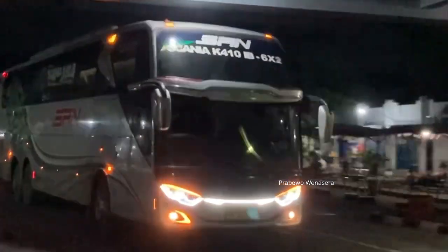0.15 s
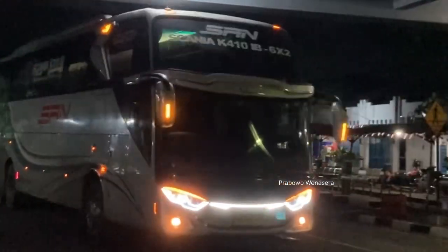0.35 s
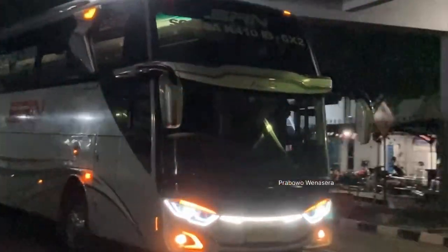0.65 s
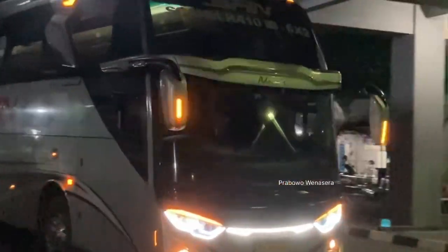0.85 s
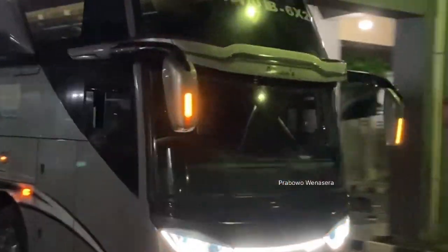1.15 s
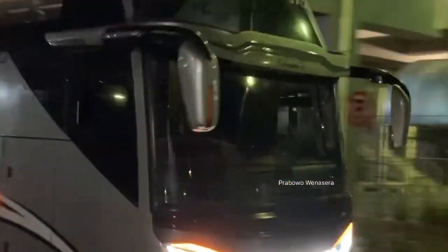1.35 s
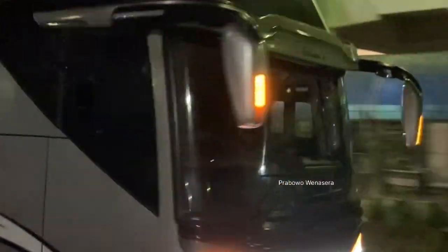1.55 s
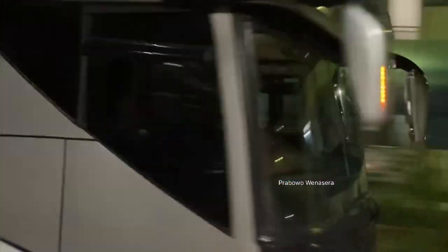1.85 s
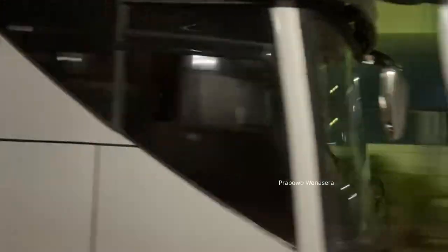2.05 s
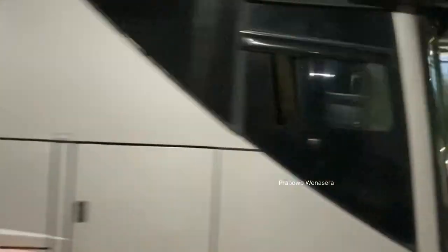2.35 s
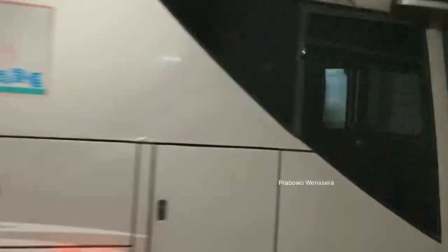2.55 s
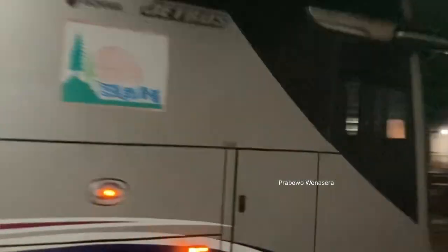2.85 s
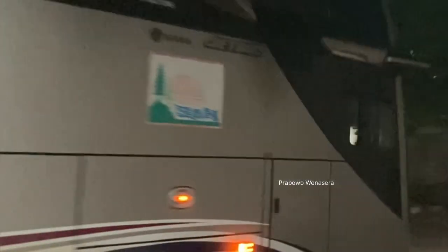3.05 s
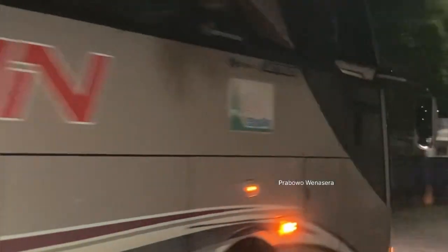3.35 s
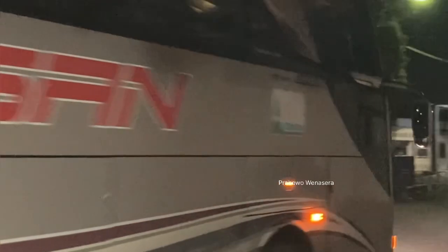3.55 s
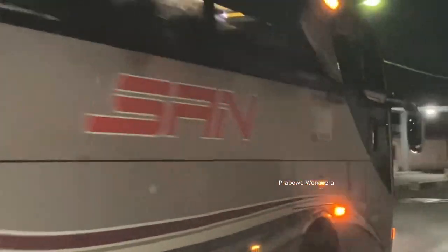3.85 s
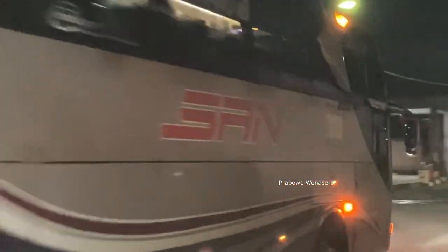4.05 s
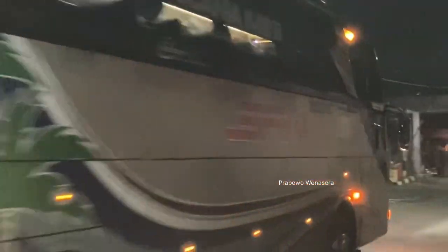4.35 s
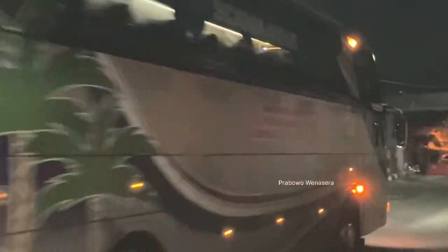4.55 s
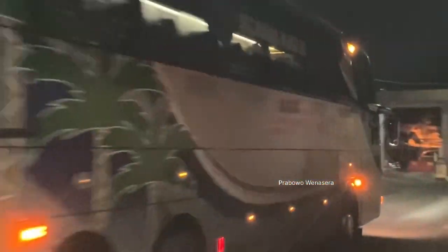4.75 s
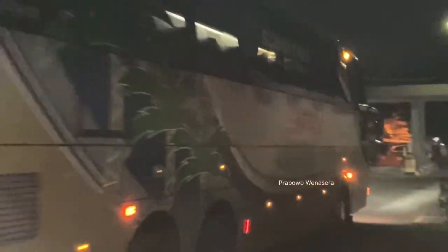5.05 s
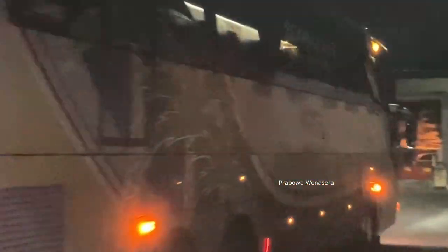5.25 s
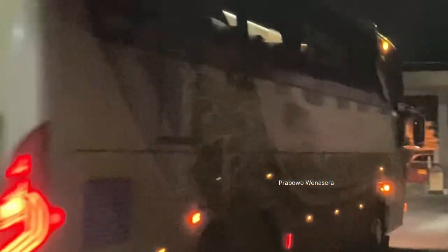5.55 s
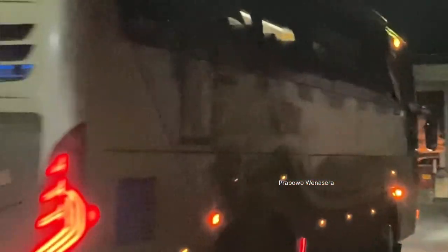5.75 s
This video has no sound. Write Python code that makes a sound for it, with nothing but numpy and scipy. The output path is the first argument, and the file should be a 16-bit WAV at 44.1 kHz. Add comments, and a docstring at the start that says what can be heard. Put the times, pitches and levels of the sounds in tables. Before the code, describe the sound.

Outdoors at the roadside, a large diesel coach approaches slowly with a low droning exhaust, faint gear hum and wavering belt whine. Soft low jolts thud as the body passes very close to the stereo microphone. Tyres hum, grit cracks and air sputters beneath; then the rear engine brings knocking clatter, broad fan roar and bright hiss with a sharp air spit, before everything sinks and eases off.

```python
"""At the roadside a diesel coach rolls up slowly, exhaust droning and tyres humming; gears and belt whine.
It passes at arm's length, the body jolting, grit cracking and air sputtering and spitting underneath.
The rear engine comes last: knock, clatter and grille noise swell with fan wash, intake hiss and sinking
resonances. Then the coach leaves and the engine eases off. Noise shaped by spectra and gates makes the
rough sounds, wavering sines the notes; left and right differ in level and phase."""
import sys
import numpy as np
from scipy import signal
from scipy.fft import rfft, irfft, next_fast_len
from scipy.io import wavfile
from scipy.ndimage import map_coordinates

SR = 44100
rng = np.random.default_rng(int(sys.argv[2]) if len(sys.argv) > 2 else 0)


def inscribe(sig):
    """Save sig as 16-bit PCM at rate SR to the path in sys.argv[1].

    A 1-D sig is mono; a 2-D sig holds one channel per row.
    Samples are clipped to [-1, 1] before scaling.
    """
    pcm = np.round(np.clip(np.atleast_2d(sig).T, -1, 1) * 32767)
    wavfile.write(sys.argv[1], SR, pcm.astype(np.int16))


N = 260190

# when the wheels and the engine bay are closest to the microphone (s)
WHEELS_S, ENGINE_S = 3.56, 4.36
# colour of the hard combustion clatter: [f/Hz, level/dB per Hz]
CLATTER_COLOUR = [(500, -19), (800, -6.5), (1050, 1.5), (1300, -0.5), (1550, -1.5), (2000, -3.5),
                  (2500, -8.5), (3400, -15), (6000, -41)]
# colour of spitting air and of cracking grit: [f/Hz, level/dB per Hz]
SPIT_COLOUR = [(3000, -21), (6000, 2.5), (7800, 2), (10000, 4.5), (13000, 4.5), (16000, -38)]


def amp(db):
    """Decibels to gain."""
    return 10 ** (np.asarray(db) / 20)


def unit(x):
    """Scale to rms 1."""
    return x / np.sqrt(np.mean(np.abs(x) ** 2) + 1e-20)


def along(points, hz):
    """Read (f/Hz, value) points on a log frequency axis."""
    f, v = np.transpose(points)
    return np.interp(np.log(hz + 1), np.log(f + 1), v)


def curves(rows):
    """One value per sample for each column after the time."""
    s, *cols = np.transpose(rows)
    return [np.interp(np.arange(N) / SR, s, c) for c in cols]


def wobble(rate):
    """A smooth random curve of rms 1, with rate knots a second."""
    knots = rng.standard_normal(2048)
    return unit(map_coordinates(knots, [np.arange(N) * rate / SR], mode="wrap"))


def step(middle_s, half_s):
    """A smooth rise from 0 to 1."""
    return (1 + np.tanh((np.arange(N) / SR - middle_s) / half_s)) / 2


def swells(rows):
    """Level in dB of bell-shaped swells [t/s, half-length/s, level/dB], their powers added."""
    t = np.arange(N) / SR
    power = sum((amp(db) * np.exp(-((t - s) / half_s) ** 2 / 2)) ** 2 for s, half_s, db in rows)
    return 10 * np.log10(power + 1e-12)


def decays(rows, attack_s):
    """Envelope of sudden events [t/s, level/dB, t60/s] that die away."""
    envelope = np.zeros(N)
    for s, db, t60 in rows:
        age = np.maximum(np.arange(N) / SR - s, 0)
        envelope += amp(db - 60 * age / t60) * (1 - np.exp(-age / attack_s))
    return envelope


def passing(closest_s, peak_db, near_s, rise_db, fall_db):
    """Level in dB of a part going by: rise_db (coming) or fall_db (going) lost per doubling of distance.

    It counts as near for near_s either side of closest_s."""
    late = np.arange(N) / SR - closest_s
    doublings = np.log2(np.hypot(1, late / near_s))
    return peak_db - np.where(late < 0, rise_db, fall_db) * doublings


def head_on():
    """1 while the front of the body screens the treble, 0 once the flank shows."""
    return 1 - step(middle_s=1.3, half_s=0.11)


def hidden():
    """1 while the corner of the body screens the engine, else 0 (until the rear face shows)."""
    return step(middle_s=4.53, half_s=0.11) - step(middle_s=5.77, half_s=0.11)


def filtered(x, response):
    """x times a complex response of frequency."""
    size = next_fast_len(N + 8192)
    hz = np.fft.rfftfreq(size, 1 / SR)
    return irfft(rfft(x, size) * response(hz), size)[..., :N]


def bay(hz):
    """Direct sound plus the resonant ringing of engine block and panels."""
    # resonances of the engine and its bay: [f/Hz, width/Hz, level/dB]
    bay_modes = [(210, 42, -9.5), (259, 63, -2.5), (640, 175, -4.5), (1080, 290, -6), (1240, 72, -13),
                 (1910, 160, -8), (2164, 39, -1), (4050, 150, -10)]
    ringing = sum(amp(db) * 1j * hz * width / (mode * mode - hz * hz + 1j * hz * width)
                  for mode, width, db in bay_modes)
    return 1 + ringing


def rush(spectrum, gate=1, body=bay):
    """Gated stereo noise of rms 1, coloured and sent through a ringing body, usually the engine bay."""
    # likeness of left and right noise: [f/Hz, likeness/0-1]
    likeness = [(100, 1), (220, 1), (400, 0.77), (650, 0.47), (1200, 0.55), (2100, 0.58), (3000, 0.46),
                (4200, 0.12), (5300, 1), (6000, 1), (6800, 0.46), (8500, 1), (15000, 1)]

    def response(hz):
        turn = np.arccos(np.clip(along(likeness, hz), 0, 1)) / 2
        mid_side = np.array([np.cos(turn), np.sin(turn)])
        return amp(along(spectrum, hz)) * body(hz) * mid_side
    mid, side = filtered(gate * rng.standard_normal((2, N)), response)
    return unit(np.array([mid + side, mid - side]))


def bursts(cycles, share, life, scatter_db):
    """A gate with one dying burst per cycle, each of its own size, over a steady rest."""
    sizes = amp(scatter_db * rng.standard_normal(1024))[cycles.astype(int) % 1024]
    dying = unit(sizes * np.exp(-(cycles % 1) / life))
    share = np.clip(share, 0, 1)
    return np.sqrt(1 - share + share * dying ** 2)


def patches(x, depth_db, width, length):
    """Random gains lift and sink narrow bands of x for moments at a time, making the noise clumpier."""
    z = signal.stft(x, nperseg=2048)[2]
    field = rng.standard_normal(z.shape[1:])
    # smooth the random field across frequency bins, then across time frames
    for axis, span in enumerate([width, length]):
        bell = np.exp(-(np.arange(-12, 13) / span) ** 2)
        field = signal.fftconvolve(field, np.expand_dims(bell, 1 - axis), mode="same")
    gain = unit(amp(depth_db * unit(field)))
    return signal.istft(z * gain, nperseg=2048)[1][:, :N]


def tone(cycles, level_db, rough_db, drift):
    """A low line whose level and phase are a little unsteady."""
    phase = 2 * np.pi * cycles + drift * wobble(7.7)
    return amp(level_db + rough_db * wobble(13)) * np.sqrt(2) * np.sin(phase)


def whine(hz, level_db, rough, flutter_rate):
    """One wavering line, frayed by fast flutter; the rougher, the more it turns to a band of noise."""
    def shake(rate):
        return wobble(rate) + 1j * wobble(rate)
    fray, fray_rate = 0.6, 260
    flutter = unit(1 + rough * (shake(flutter_rate) + fray * shake(fray_rate)))
    line = np.exp(2j * np.pi * np.cumsum(hz) / SR)
    return amp(level_db) * np.sqrt(2) * np.real(flutter * line)


def exhaust(firings):
    """Crank orders drone from the pipe and beat against a steady low hum."""
    # swells of the drone, each on one crank order: [t/s, half-length/s, level/dB, order]
    drone_swells = [(0, 0.21, -36.5, 6), (1.1, 0.6, -40, 6), (0.72, 0.055, -33.5, 8), (1.337, 0.36, -35, 8),
                    (2.05, 0.23, -37, 3), (2.9, 0.3, -38, 3), (2.5, 0.56, -30.5, 6),
                    (2.548, 0.35, -38.5, 17), (2.898, 0.091, -29.5, 6), (3.45, 0.37, -36.5, 6),
                    (3.45, 0.098, -41, 8), (3.53, 0.052, -33.5, 15), (4.544, 0.55, -34, 8),
                    (4.8, 0.33, -35.5, 6), (5.544, 0.36, -34.5, 15), (5.638, 0.22, -31, 6),
                    (5.75, .3, -36.5, 8)]
    # swells of the hum: [t/s, half-length/s, level/dB]
    hum_swells = [(.48, 0.13, -32), (1.03, 0.12, -32), (2.1, 0.38, -40), (3.08, 0.14, -28),
                  (3.35, 0.17, -32), (4.0, 0.091, -26), (4.2, 0.14, -29)]
    turns = firings / 3  # six cylinders fire three times per crank turn
    drone = sum(tone(round(order) * turns, swells([(s, half_s, db)]), rough_db=0.8, drift=0.1)
                for s, half_s, db, order in drone_swells)
    hum_hz, hum_rest_db = 60, -40.3  # pitch, and the level kept between swells
    hum_db = 20 * np.log10(np.hypot(amp(hum_rest_db), amp(swells(hum_swells))))
    hum = tone(hum_hz * np.arange(N) / SR, hum_db, rough_db=-1, drift=0.11)
    return drone + hum


def puffs(firings, uneven, rough):
    """One pressure pulse per firing; the six cylinders differ, which fills in the half orders."""
    # colour of the tail pipe: [f/Hz, level/dB]
    pipe_colour = [(60, -38), (130, -0.5), (200, 4.5), (300, 2.5), (450, -5.5), (900, -26)]
    at = np.flatnonzero(np.diff(np.floor(firings)))
    cylinders = 1 + uneven * unit(rng.standard_normal(6))
    train = np.zeros(N)
    train[at] = np.resize(cylinders, len(at)) + rough * rng.standard_normal(1024)[:len(at)]
    return unit(filtered(train, lambda hz: amp(along(pipe_colour, hz)) * bay(hz)))


def engine(firings):
    """Firings thump the pipe, knock the block and set injectors and valves clattering over a low rumble.

    Of knock, clatter and grille noise, the brighter the layer, the more sharply it peaks in passing."""
    # colours of rumble, block knock and grille noise: [f/Hz, level/dB per Hz]
    rumble_colour = [(15, -40), (30, -16), (40, -7), (48, -2), (65, -2.5), (85, 1), (110, -4.5),
                     (135, -3.5), (170, -14.5), (300, -49)]
    knock_colour = [(90, -25), (160, -0.5), (250, 0), (400, -1.5), (500, -3.5), (720, -2), (900, -2.5),
                    (1400, -27.5)]
    grille_colour = [(1500, -15.5), (2500, 5), (3100, 0), (4200, -6), (5000, -5.5), (6200, -17),
                     (9000, -49)]
    # brief surges of clatter and of the brighter grille noise: [t/s, half-length/s, level/dB]
    clatter_surges = [(4.01, .025, -27.5), (4.29, .08, -26.5), (5.82, .05, -33)]
    grille_surges = [(4.322, .02, -25), (4.3, .07, -28)]

    pipe_s = 3.55  # the tail pipe is closest
    rumble_db = passing(pipe_s, peak_db=-27.5, near_s=0.62, rise_db=2.5, fall_db=3.0)
    pipe_db = passing(pipe_s, peak_db=-36.0, near_s=0.77, rise_db=2.5, fall_db=1.0)
    # the body corner and, for the grille, the front take off some level (dB)
    knock_db = passing(ENGINE_S, peak_db=-26.5, near_s=0.56, rise_db=2.0, fall_db=2.0) - 2.5 * hidden()
    clatter_db = passing(ENGINE_S, peak_db=-24.0, near_s=0.4, rise_db=3.5, fall_db=2.5) - 3.2 * hidden()
    grille_db = passing(ENGINE_S, peak_db=-25, near_s=0.16, rise_db=3.0, fall_db=5.0)
    grille_db = grille_db - 3.5 * hidden() - 3 * head_on()

    pipe = amp(pipe_db) * puffs(firings, uneven=0.36, rough=0.14)
    rumble = amp(rumble_db + 0.15 * wobble(11)) * rush(rumble_colour)
    knock_gate = bursts(firings, share=0.15, life=0.59, scatter_db=3)
    knock = amp(knock_db) * rush(knock_colour, knock_gate)
    clatter_gate = bursts(firings, share=0.12, life=0.39, scatter_db=3)
    clatter_gain = np.hypot(amp(clatter_db + 0.71 * wobble(20)), amp(swells(clatter_surges)))
    clatter = clatter_gain * rush(CLATTER_COLOUR, clatter_gate)
    grille_gate = bursts(firings, share=0.24, life=0.7, scatter_db=1.5)
    grille_gain = np.hypot(amp(grille_db + 0.75 * wobble(22)), amp(swells(grille_surges)))
    grille = grille_gain * rush(grille_colour, grille_gate)
    roar = patches(knock + clatter + grille, depth_db=2, width=1.3, length=2.8)

    # all but the exhaust drone is quieter until the engine takes up load
    coast_db = -4
    load = amp(coast_db * (1 - step(middle_s=0.24, half_s=0.34)))
    return exhaust(firings) + load * (pipe + rumble + roar)


def tyres():
    """The wheels hum and rustle as they roll past."""
    # cavity hum and tread rustle: [f/Hz, level/dB per Hz]
    tyre_colour = [(200, -33), (280, -10), (370, -1.5), (440, -0.5), (520, -6), (700, -17), (950, -9),
                   (1200, -13), (1600, -21), (2300, -7.5), (2700, -14), (4500, -29)]
    roll_db = passing(WHEELS_S, peak_db=-30.5, near_s=1.0, rise_db=8.5, fall_db=29)
    return amp(roll_db) * rush(tyre_colour)


def drive(speed):
    """Rotating gears, belt, pulley and fan each sing on wavering lines, the pulley on two of its orders."""
    # pitch of gear hum and belt whine: [t/s, f/Hz]
    gear_pitch = [(1.5, 352), (2.9, 345), (3.4, 360), (4, 334)]
    belt_pitch = [(.5, 1280), (.8, 1280), (1.05, 1298), (1.24, 1320), (1.31, 1298), (1.43, 1372),
                  (1.6, 1345), (1.74, 1335), (1.85, 1250), (4.49, 1360)]
    # pitch of the pulley, which slides down as it goes by: [t/s, f/Hz]
    pulley_pitch = [(4.05, 2170), (4.25, 2030), (4.45, 1860), (4.6, 1755), (4.75, 1700), (4.9, 1715)]
    # the gear hum comes and goes about twice a second: [t/s, level/dB]
    gear_swells = [(.45, -37), (1.05, -35.5), (1.55, -37), (2.4, -40), (2.88, -34), (3.38, -36.5),
                   (3.98, -33)]
    # swells of belt whine, rough belt rub and pulley whine: [t/s, half-length/s, level/dB]
    belt_swells = [(1.15, .45, -39.5), (0.79, 0.05, -34), (1.28, 0.035, -34), (1.47, .05, -40),
                   (1.605, .026, -29), (1.72, .025, -39), (1.88, .06, -40), (4.49, .018, -27)]
    rub_swells = [(1.2, 0.81, -38)]
    pulley_swells = [(3.1, .3, -42), (4.02, 0.06, -33), (4.47, .05, -32), (4.63, 0.055, -32),
                     (4.85, 0.065, -32), (5.75, 0.24, -44)]

    gear_half_s = 0.12
    gear_db = swells([(s, gear_half_s, db) for s, db in gear_swells])
    gear = whine(curves(gear_pitch)[0], gear_db, rough=0.41, flutter_rate=25)
    belt = whine(curves(belt_pitch)[0], swells(belt_swells), rough=0.45, flutter_rate=45)
    rub_hz = np.full(N, 1119)
    rub = whine(rub_hz, swells(rub_swells), rough=4, flutter_rate=240)
    pulley_hz, = curves(pulley_pitch)
    pulley_db, lower_order_db = swells(pulley_swells), -3
    pulley = whine(pulley_hz, pulley_db, rough=0.8, flutter_rate=70)
    pulley_low = whine(pulley_hz * 3 / 4, pulley_db + lower_order_db, rough=1.1, flutter_rate=70)
    fan_db = passing(ENGINE_S, peak_db=-37, near_s=0.74, rise_db=5, fall_db=2.0)
    fan_ratio = 15.3  # fan cycles per firing
    fan = whine(fan_ratio * speed, fan_db, rough=1.5, flutter_rate=60)
    return gear + belt + rub + pulley + pulley_low + fan


def jolts():
    """Bumps in the road push the body, which thuds low in a swing or two."""
    # jolts: [t/s, level of the bell/dB, f/Hz]
    jolt_rows = [(.911, -19, 65), (.962, -18, 69), (1.043, -16.5, 85), (1.109, -22, 96), (1.514, -21, 92),
                 (1.84, -19, 55), (2.413, -20, 75), (2.447, -17.5, 70), (2.721, -19, 70), (4.877, -23, 91),
                 (5.289, -23, 65)]
    t = np.arange(N) / SR
    half_s = 0.0064
    return sum(amp(swells([(s, half_s, db)])) * np.sin(2 * np.pi * hz * (t - s))
               for s, db, hz in jolt_rows)


def air(firings):
    """Hiss and fizz from the rear, leaks that sputter with the firings, and valves that chuff and spit."""
    # colours of hiss and of fizz: [f/Hz, level/dB per Hz]
    hiss_colour = [(3500, -41), (5500, -4.5), (7000, 4), (8700, 2.5), (10500, 6), (12500, -7), (16000, -10)]
    fizz_colour = [(5000, -10), (8000, -11.5), (12000, -4.5), (14500, 2.5), (16000, 0)]
    # soft chuffs, and sputtering leaks under the body going by: [t/s, half-length/s, level/dB]
    chuffs = [(.935, .022, -42), (1.01, 0.034, -47), (2.562, 0.014, -41), (2.64, 0.019, -41.5),
              (2.838, 0.027, -36), (3.36, .06, -42), (3.45, .016, -33.5), (3.955, 0.025, -37.5)]
    leaks = [(2.32, 0.16, -49), (2.3, 0.94, -38), (2.845, .012, -35), (3.5, 0.21, -35), (4.5, 0.13, -38.5),
             (4.66, .008, -30.5)]
    # sharp spits: [t/s, level/dB, t60/s]
    spits = [(2.9602, -31, 0.18), (4.2009, -14.5, 0.068), (4.216, -27, .07)]

    hiss_db = passing(ENGINE_S, peak_db=-33.5, near_s=0.096, rise_db=3.0, fall_db=2.5)
    hiss_db = hiss_db - 4 * head_on()
    fizz = amp(passing(ENGINE_S, peak_db=-35.0, near_s=0.37, rise_db=6.5, fall_db=5.5))
    leak = amp(swells(leaks))
    both = np.hypot(fizz, leak)
    fizz_share, leak_share = 0.07, 0.48  # how much of each comes in step with the firings
    share = (fizz_share * fizz ** 2 + leak_share * leak ** 2) / both ** 2
    gate = bursts(firings, share, life=0.38, scatter_db=1.0)
    hiss_gain = amp(hiss_db + 1.4 * wobble(20) + 0.84 * wobble(90))
    hiss = hiss_gain * rush(hiss_colour, gate ** 0.1)  # the hiss barely follows the firings
    sputter = both * amp(1.2 * wobble(35)) * rush(fizz_colour, gate)
    chuff_gain = amp(swells(chuffs) + 1.6 * wobble(120))
    valves = (decays(spits, attack_s=0.00063) + chuff_gain) * rush(SPIT_COLOUR)
    return patches(hiss + sputter, depth_db=1.6, width=1.6, length=1.1) + valves


def underbody(firings):
    """Hard combustion knocks escape under the flank, loudest before the engine itself arrives."""
    under_db = passing(WHEELS_S + 0.1, peak_db=-29.5, near_s=0.6, rise_db=6, fall_db=14)
    knocks = bursts(firings, share=0.5, life=0.3, scatter_db=2)
    rattle = bursts(4 * firings, share=0.4, life=0.35, scatter_db=1.5)  # four to a firing
    noise = rush(CLATTER_COLOUR, knocks * rattle, body=np.ones_like)
    return amp(under_db) * patches(noise, depth_db=2.2, width=1.3, length=2.5)


def pings():
    """Small hard parts tick, each on one short, high note."""
    # metallic ticks: [t/s, level/dB, f/Hz]
    ping_rows = [(1.8916, -30.5, 7970), (4.9916, -23.5, 8770)]
    t = np.arange(N) / SR
    t60_s = 0.039
    return sum(decays([(s, db, t60_s)], attack_s=0.0005) * np.sin(2 * np.pi * hz * t)
               for s, db, hz in ping_rows)


def grit(rate, life):
    """Road grit cracks under the treads: rate ticks a second of random size, dying over life seconds."""
    t = np.arange(N) / SR
    cracks = (rng.random(N) < rate / SR) * np.minimum(rng.exponential(1, N), 2)
    ticks = signal.fftconvolve(cracks, np.exp(-t[:SR // 8] / life))[:N]
    grit_db = passing(WHEELS_S, peak_db=-50.5, near_s=0.93, rise_db=15, fall_db=10)
    return amp(grit_db) * rush(SPIT_COLOUR, ticks)


def fan_wash():
    """The cooling fan blows a broad roar out sideways, strongest while the rear flank goes by."""
    # colour of the blown air: [f/Hz, level/dB per Hz]
    wash_colour = [(200, -24), (340, 2), (480, -0.5), (620, 3.5), (820, 5), (1100, 0.5), (1480, 1),
                   (2150, -6), (2700, -25.5), (4000, -48)]
    wash_db = passing(closest_s=4.1, peak_db=-24.5, near_s=0.36, rise_db=5.5, fall_db=11.5)
    noise = rush(wash_colour, body=np.ones_like)
    return amp(wash_db) * patches(noise, depth_db=2, width=1.2, length=4)


def intake(firings):
    """The rear air intake hisses bright and grainy, mostly backwards, so it lingers as the coach leaves."""
    # colour of the intake: [f/Hz, level/dB per Hz]
    intake_colour = [(2300, -25), (3100, 6), (3600, 2), (4200, 10), (4900, -7), (6200, -42), (8000, -45)]
    intake_db = passing(ENGINE_S, peak_db=-32.5, near_s=0.25, rise_db=11, fall_db=6.0)
    gulps = bursts(firings, share=0.33, life=0.4, scatter_db=2)
    return amp(intake_db) * patches(rush(intake_colour, gulps), depth_db=3.2, width=1.8, length=2.5)


def moving_resonances():
    """Two rough moving resonances, as of noise reflected off the ground, that sink and then climb."""
    # upper and lower resonance: [t/s, f/Hz, level/dB]
    upper = [(4.1, 2550, -50), (4.22, 2460, -30), (4.33, 2300, -30), (4.43, 2100, -30), (4.52, 1950, -31),
             (4.64, 1780, -35), (4.75, 1660, -33.5), (4.92, 1720, -36), (5.02, 1850, -48),
             (5.22, 2000, -40), (5.4, 2050, -55)]
    lower = [(4.15, 1650, -48), (4.3, 1540, -28.5), (4.38, 1400, -34), (4.42, 1090, -28), (4.55, 1080, -32),
             (4.68, 1010, -34), (4.78, 1230, -39), (4.92, 1300, -33), (5.05, 1330, -48)]
    return sum(whine(*curves(track), rough=4, flutter_rate=130) for track in (upper, lower))


def scene():
    """The whole coach, its engine timed by one crankshaft."""
    # engine speed: [t/s, firings of the six cylinders per s]
    engine_speed = [(.1, 44), (.4, 43.5), (.72, 42), (1, 44.8), (1.55, 46.3), (2.1, 46.5), (2.4, 45.6),
                    (2.7, 46.4), (3, 45.2), (3.45, 44.8), (3.75, 43.5), (4.15, 44.6), (4.55, 43),
                    (4.8, 40.4), (5.1, 41), (5.4, 40.2), (5.8, 40.6)]
    speed, = curves(engine_speed)
    firings = np.cumsum(speed) / SR
    road = tyres() + jolts() + pings() + grit(rate=51, life=0.0051)
    rear = engine(firings) + underbody(firings) + fan_wash() + intake(firings)
    return rear + road + drive(speed) + air(firings) + moving_resonances()


def record(dry):
    """Left and right differ in level and phase by frequency; nothing passes the band limit."""
    # left-right level difference: [f/Hz, left minus right/dB]
    balance = [(60, 5.5), (160, 4.5), (300, 6), (480, 10.5), (700, 5.5), (1000, 1.5), (1500, 0), (2100, -2),
               (2800, 1), (7000, -0.5)]
    # left-right phase difference: [f/Hz, lead of the left/rad]
    lead = [(20, 0), (150, -0.1), (300, -0.54), (480, -0.6), (750, -1.9), (1200, -1), (1750, -0.4),
            (2100, 1.5), (2550, 3), (4000, 1.5), (5000, 2.5), (6200, 4), (7700, 5.5), (9400, 7),
            (11200, 9.5), (12600, 9.6), (14200, 12.5), (16000, 11.5)]
    top_hz = 16000

    def left_right(hz):
        sides = np.array([[1], [-1]]) / 2
        gains = amp(sides * along(balance, hz))
        gains = gains / gains.mean(axis=0)
        return gains * np.exp(1j * sides * along(lead, hz)) * (hz < top_hz)
    return filtered(dry, left_right)


dry = scene()
out = record(dry)
inscribe(out)
```